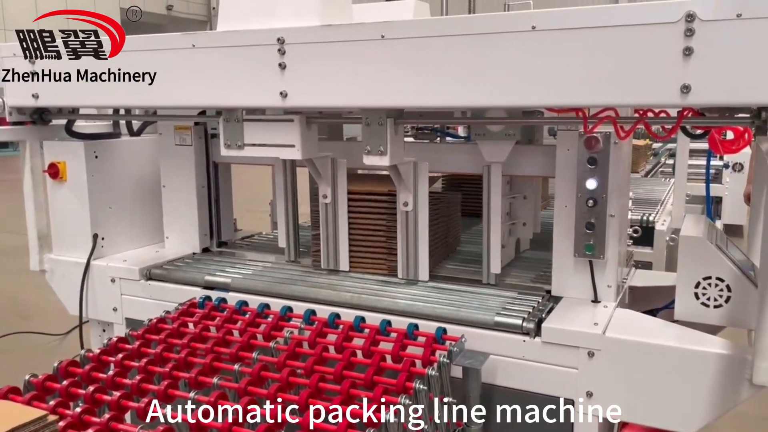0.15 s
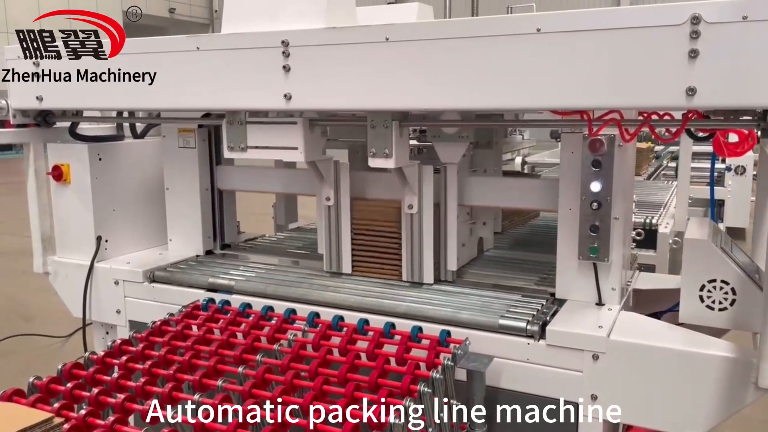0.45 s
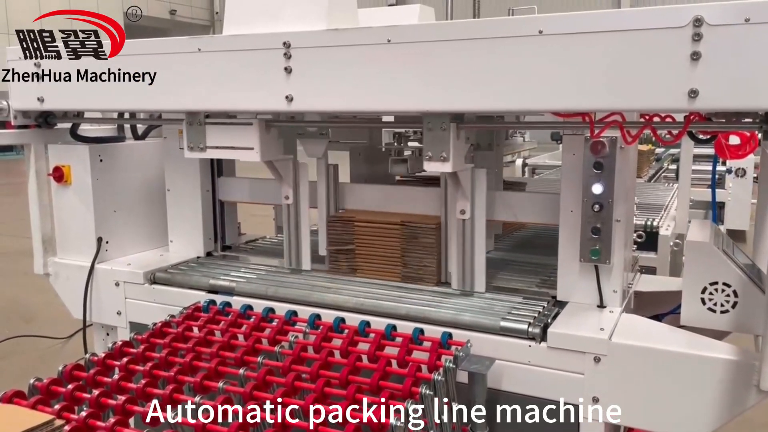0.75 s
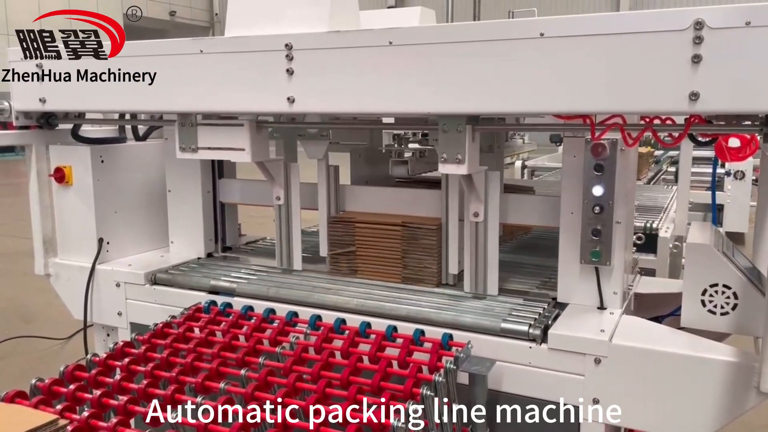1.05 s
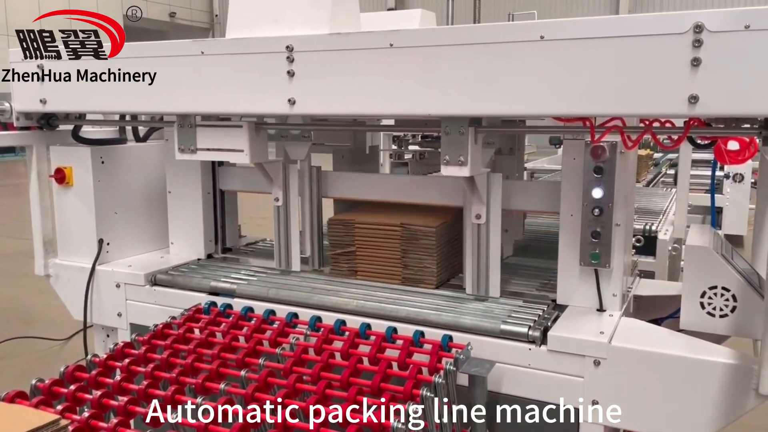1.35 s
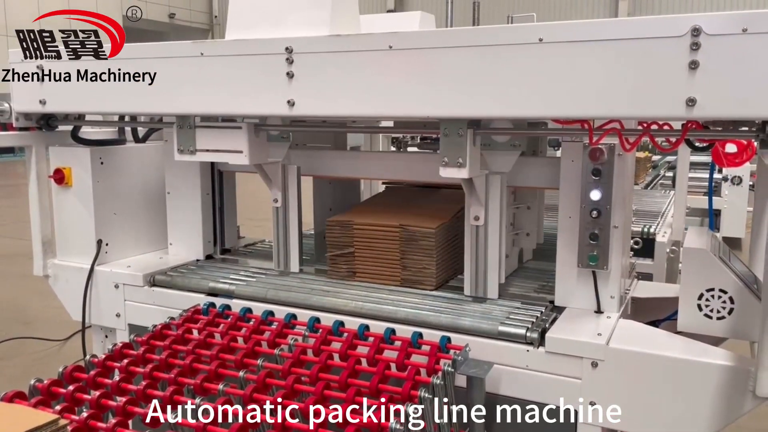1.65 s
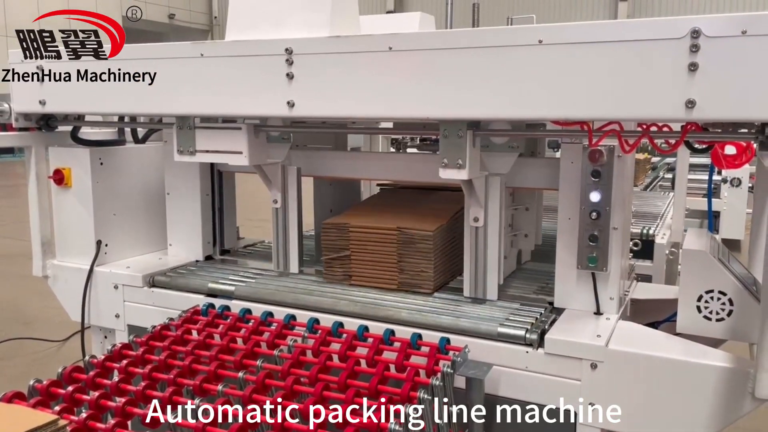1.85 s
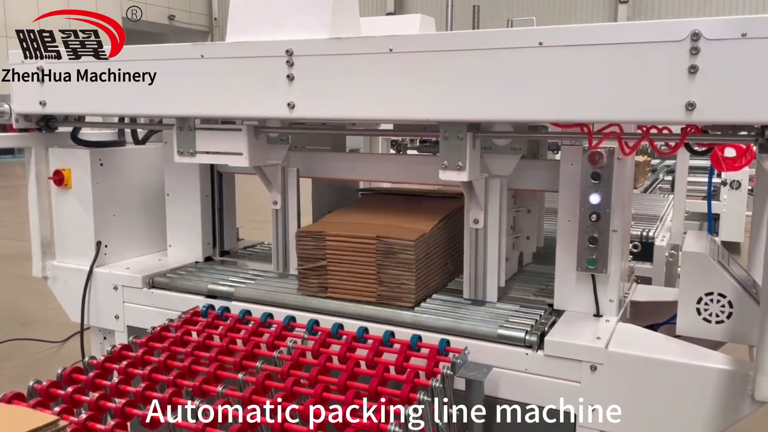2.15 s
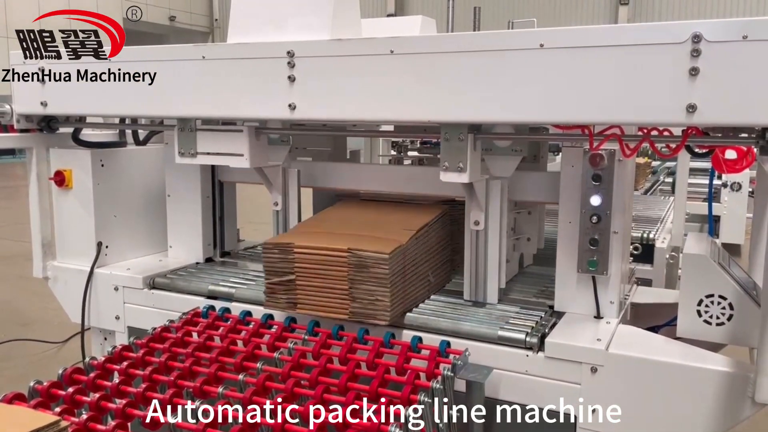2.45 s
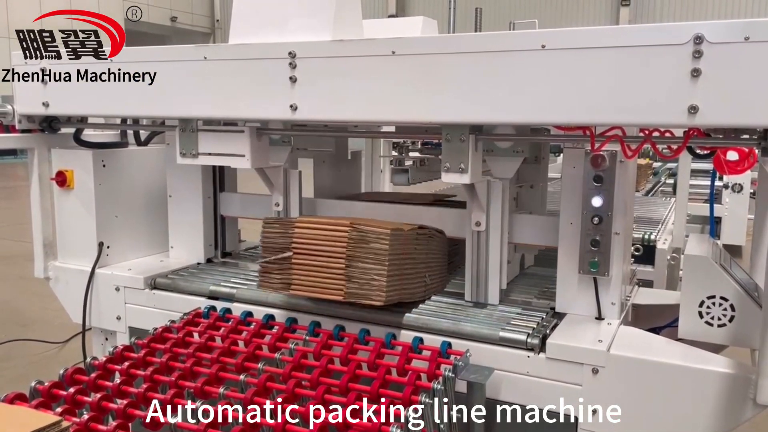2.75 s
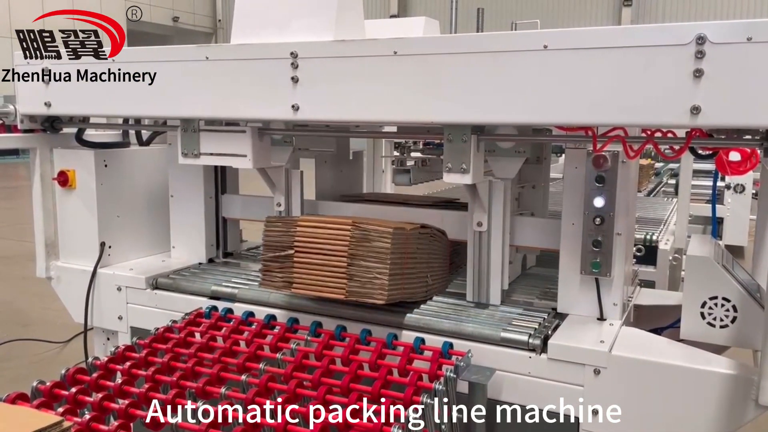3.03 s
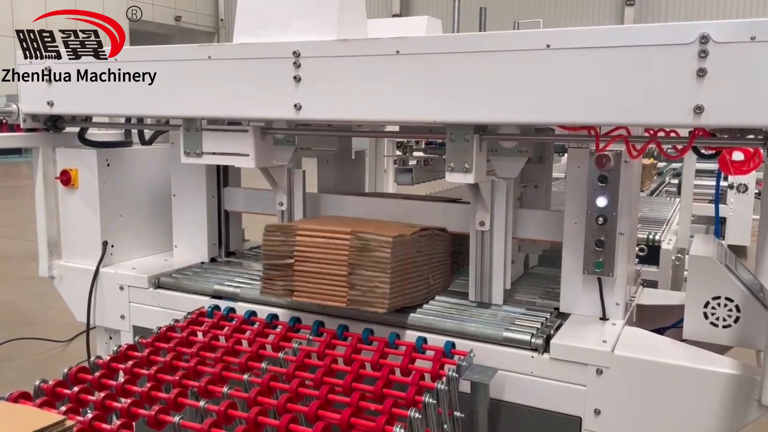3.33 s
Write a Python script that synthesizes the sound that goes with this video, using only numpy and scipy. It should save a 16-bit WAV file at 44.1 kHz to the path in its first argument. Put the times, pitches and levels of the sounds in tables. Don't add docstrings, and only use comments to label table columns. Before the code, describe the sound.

A packing machine clacks and thuds over roller rumble and scraping belts, with a triple snap early on, a brief motor hum, and rising servo whines, heard from a couple of metres in a factory hall.

```python
import sys
import numpy as np
from scipy import signal
from scipy.fft import rfft, irfft, next_fast_len
from scipy.io import wavfile
from scipy.ndimage import uniform_filter1d

SR = 44100
rng = np.random.default_rng(int(sys.argv[2]) if len(sys.argv) > 2 else 0)


def attenuation_scalar(level_db):
    decades = np.asarray(level_db, float) / 20
    return 10 ** decades


def generate_wav(signal):
    frames = np.transpose(np.atleast_2d(signal))
    scaled = np.clip(frames, -1, 1) * 32767
    pcm = np.round(scaled).astype(np.int16)
    wavfile.write(sys.argv[1], SR, pcm)


N = 153909

# (time [s], level [dB])
ROLLER_LOAD = [(0, -30.5), (.2, -33.5), (.4, -28.5), (.5, -24.5), (.8, -21.5), (.93, -23), (1.2, -21.5),
               (1.45, -27), (1.65, -26), (1.85, -33), (2.05, -27), (2.3, -31), (2.6, -29), (2.85, -33),
               (3.2, -33), (3.49, -31.5)]
# (pitch [Hz], width [Hz], level [dB])
FRAME_RESONANCES = [(63, 100, 4), (129, 61, 0), (219.4, 40, 3.5), (317, 57, -0.5), (385, 125, 3),
                    (590, 320, -5.5), (810, 50, -15), (1160, 550, -7.5)]
# (time [s], level [dB])
BELT_SCRAPE = [(0, -34.5), (.3, -32.5), (.6, -32), (.8, -30), (.94, -40.5), (1.1, -35.5), (1.4, -32.5),
               (1.68, -37.5), (1.9, -33), (2.15, -31), (2.25, -39), (2.6, -35.5), (2.85, -30.5),
               (3.02, -39), (3.49, -38.5)]
# (frequency [Hz], level [dB])
SCRAPE_COLOUR = [(700, 5.5), (1300, -53), (2000, 6), (2800, 8), (4500, 5), (6500, -1.5), (9000, -3),
                 (13000, -5.5)]
# (pitch [Hz], width [Hz], level [dB])
STEEL_RESONANCES = [(1176, 610, -0.5), (1820, 18, 1.5), (2450, 69, -4.5), (2900, 120, -1.5),
                    (4150, 42, -12), (4700, 280, -6)]
# (frequency [Hz], level [dB])
HALL_COLOUR = [(25, -1), (60, -14), (250, 0), (500, -4), (1200, -8), (2500, -8), (14000, -32)]
LINK_NOTES = [802, 1138, 1368, 1775, 2540, 2730, 3428, 3830, 4080, 4220, 4450, 4700, 5300]
# (time [s], level [dB], ring [Hz])
THUDS = [(.02, -26, 234), (0.086, -25.5, 79), (0.531, -12.5, 292), (2.129, -19, 367), (3.204, -32.5, 74),
         (0.253, -24, 240), (.26, -29.5, 75), (0.369, -22.5, 376), (.451, -6.5, 410), (.468, -11.5, 330),
         (.509, -16.5, 266), (0.571, -16, 237), (.678, -20, 191), (0.788, -12, 262), (1.25, -25, 69),
         (1.543, -21, 374), (1.709, -18.5, 313), (1.934, -13, 252), (2.109, -17, 350), (2.17, -27.5, 78),
         (2.5021, -19, 510), (2.639, -23, 250), (3.074, -16.5, 471), (3.276, -26, 183)]
# (time [s], level [dB], ring [Hz], fall [dB per 10 ms])
TICKS = [(.113, -20, 1700, 7), (.122, -21, 1750, 8), (0.436, -21, 2590, 2), (.61, -27, 2900, 4),
         (0.654, -26, 1750, 4), (0.5, -16, 1330, 9), (.648, -15.5, 1700, 7), (.6, -25, 870, 14),
         (.682, -18, 1770, 4), (.698, -20, 4530, 3.5), (.765, -26, 1170, -0.5), (.428, -17.5, 1240, 11),
         (.476, -19.5, 1230, 3), (0.513, -22, 1500, 12), (1.486, -26.5, 2620, -1),
         (1.718, -22.5, 1240, 3.5), (1.762, -24, 2290, 1.5), (1.903, -27, 1200, -0.5),
         (2.582, -25, 2540, 6.5), (2.799, -24, 2300, 8), (3.089, -29.5, 1170, -5),
         (2.504, -24.5, 2650, 6.5), (2.623, -24, 4800, 2.5), (2.635, -26, 4340, 6), (2.683, -28, 2780, 6),
         (2.72, -35, 3250, 10), (3.165, -37, 810, 10), (3.333, -31, 1320, 1), (3.357, -29.5, 2320, 3.5),
         (3.465, -31, 1290, 2)]
# (time [s], level [dB], pitch [Hz], time to fall 60 dB [s])
RINGS = [
    (.114, -19, 1792, .12),
    (.426, -24, 1770, .12),
    (.4505, -14, 1204, .06),
    (.4505, -12, 555, .05),
    (.652, -23, 1740, .1),
    (.684, -25, 1768, 0.11),
    (2.503, -12.5, 530, 0.037),
    (2.777, -20, 4620, .05),
    (3.074, -24, 475, .15),
    (3.277, -26, 191, 0.14),
]
# (time [s], level [dB], ring [Hz], treble [dB], fall [dB per 10 ms])
PUSHES = [
    (2.26, -40, 230, -22, 0.5),
    (.355, -11.5, 3160, -4, 4.5),
    (.42, -15.5, 1770, -20, 3),
    (2.04, -20, 5330, -5, 1.5),
    (2.63, -12, 3070, -11, 6),
    (3.062, -14, 2240, -9, 5),
    (3.27, -33.5, 5030, 11, 0.5),
]
# (time [s], level [dB], ring [Hz], treble [dB], fall [dB per 10 ms])
CLACKS = [(.441, -9.5, 1310, -17, 14), (.99, -22, 2540, -25, 1.5), (1.286, -19, 3000, -20, 4.5),
          (1.453, -13.5, 3700, -51, 7), (1.565, -13.5, 2640, -6, 8.5), (1.582, -14, 2640, -25, 3.5),
          (2.157, -10.5, 5500, -15, 6), (2.4315, -16.5, 4260, -16, 5), (2.534, -23, 2160, -21, 2),
          (2.776, -13, 4370, -45, 6.5), (2.892, -13, 4100, -12.5, 3.5), (2.92, -13, 3830, -7, 10)]
# (time [s], level [dB], ring [Hz], treble [dB], fall [dB per 10 ms])
SNAPS = [
    (.4505, -12.5, 1170, -15, 5.1),
    (.8205, -5.5, 4460, -10, 19),
    (.8295, -2, 4700, -19, 21),
    (.8365, -3.5, 3800, -31, 23),
    (1.546, -8.5, 1320, -4, 5.8),
]
# (start [s], length [s], from [Hz], towards [Hz], level [dB])
SERVO_RUNS = [
    (.575, .245, 2300, 4000, -42),
    (1.815, .32, 2400, 4020, -42),
    (2.6, .055, 3500, 1900, -44),
    (2.66, .205, 2350, 3950, -39.5),
]
# (multiple of the pitch, level [dB])
SERVO_OVERTONES = [(1, 3.5), (2, 1), (3, -5)]
# (time [s], pitch [Hz], level [dB])
DRIVE_HUM = [(1.005, 200.5, -58), (1.03, 200.5, -23), (1.11, 200, -30), (1.14, 198.5, -26),
             (1.25, 198, -26), (1.39, 198, -36), (1.55, 198, -52), (1.8, 196, -37), (2.0, 196, -58)]
# (multiple of the pitch, level [dB])
HUM_OVERTONES = [(1, 0), (2, -18), (4, -24)]
# (frequency [Hz], shared part [0 to 1])
PORT_LIKENESS = [(60, .8), (150, .97), (300, .92), (600, .62), (5000, .47), (7700, .94), (9200, .99),
                 (13000, .86)]
# (frequency [Hz], phase [radians])
PORT_LEAD = [(900, 0), (1800, -.9), (3450, 1.2), (5800, -1.4), (6800, -.6), (7800, -np.pi), (9750, -np.pi),
             (12200, -2 * np.pi)]
# (frequency [Hz], level [dB])
MIC_COLOUR = [(30, -11), (60, 0), (5000, -3.5), (6800, -6.5), (8500, -2), (12500, -2), (15000, -11),
              (16200, -32)]


def curve(table, hz):
    f, v = np.array(table, float).T
    return np.interp(np.log(hz + 1), np.log(f), v)


def follow(table, t, column=1):
    points = np.array(table)
    return np.interp(t, points[:, 0], points[:, column])


def peaks(table, hz):
    return np.sqrt(sum(attenuation_scalar(db) ** 2 / (1 + (2 * (hz - f) / width) ** 2) for f, width, db in table))


def unit(x):
    return x / np.sqrt(np.mean(x ** 2))


def walk(rate):
    k = int(SR / rate)
    steps = np.repeat(rng.standard_normal(N // k + 1), k)
    return unit(uniform_filter1d(uniform_filter1d(steps, k), k)[:N])


def ports(noise, gain):
    n = noise.shape[-1]
    like = np.clip(curve(PORT_LIKENESS, np.arange(n // 2 + 1) * SR / n), 0, 1)
    s = rfft(noise) * gain
    return irfft(s[:1] * np.sqrt(like) + s[1:] * np.sqrt(1 - like), n)


def steady(gain, flicker_db, rate):
    n = 2 * next_fast_len(N // 2 + 1)
    hz, out = np.arange(n // 2 + 1) * SR / n + 1, 0
    for k in range(10):
        band = np.clip(1 - abs(np.log2(hz / 31.25) - k), 0, 1)
        noise = ports(rng.standard_normal((3, n)), gain(hz) * np.sqrt(band))[:, :N]
        out = out + noise * attenuation_scalar(flicker_db * walk(rate))
    return unit(out)


def hits(rows, colour, attack_s):
    size, rattle_db = 8192, 0.5
    t, hz = np.arange(size) / SR, np.arange(size // 2 + 1) * SR / size + 1
    out = np.zeros((2, N + size))
    for start, db, *colouring, fall_db in rows:
        noise = rng.standard_normal((3, size))
        rattle = uniform_filter1d(np.repeat(rng.standard_normal(size // 64), 64), 64)
        fade = attenuation_scalar(-100 * t * max(fall_db, 1))
        shape = (1 - np.exp(-t / attack_s)) * fade * attenuation_scalar(rattle_db * rattle)
        i = int(start * SR)
        out[:, i:i + size] += unit(ports(noise, colour(hz, *colouring))) * shape * attenuation_scalar(db)
    return out[:, :N]


def rollers(t):
    rumble = steady(lambda hz: peaks(FRAME_RESONANCES, hz) * hz / (hz + 40), 1.97, 18)
    return rumble * attenuation_scalar(follow(ROLLER_LOAD, t))


def belts(t):
    def colour(hz):
        return attenuation_scalar(curve(SCRAPE_COLOUR, hz)) * (2.5 + peaks(STEEL_RESONANCES, hz))
    return steady(colour, 2.86, 17) * attenuation_scalar(follow(BELT_SCRAPE, t))


def hall():
    return steady(lambda hz: attenuation_scalar(curve(HALL_COLOUR, hz)), 6.0, 4.4) * attenuation_scalar(-40.5)


def links(t):
    size, count, t60_s = 2048, 1100, .08
    pitch_spread, scatter_db, tilt_db = .015, 2, -3
    u, z = rng.random((count, 3)), rng.standard_normal((count, 3))
    tt, out = t[:size], np.zeros((2, N + size))
    note = np.array(LINK_NOTES)[(u[:, 1] * len(LINK_NOTES)).astype(int)]
    pitches = note * (1 + pitch_spread * z[:, 0])
    for (when, _, slow), (_, strength, side), hz in zip(u, z, pitches):
        level_db = scatter_db * strength + tilt_db * np.log2(hz / 1000)
        fade = attenuation_scalar(level_db - 60 * tt / (t60_s * (.5 + slow)))
        port_phase = side * np.array([[.5], [-.5]])
        i = int(when * N)
        out[:, i:i + size] += (1 - np.exp(-tt / 0.0088)) * fade * np.sin(2 * np.pi * hz * tt + port_phase)
    return unit(out[:, :N]) * attenuation_scalar(-4 + follow(BELT_SCRAPE, t))


def thud_colour(hz, ring_hz):
    low_ring = np.exp(-.5 * (np.log2(hz / ring_hz) / 0.49) ** 2)
    return low_ring + attenuation_scalar(-19.5) / (1 + (hz / 1500) ** 2)


def thuds():
    rows = [(s, db, hz, .5 + 1.5 * hz / 100) for s, db, hz in THUDS]
    return hits(rows, thud_colour, attack_s=0.0051)


def room(x):
    t60_s, dull_hz = 0.32, 3940
    t = np.arange(SR // 2) / SR
    hz = np.arange(len(t) // 2 + 1) * 2
    tail = ports(rng.standard_normal((3, len(t))), 1 / np.hypot(1, hz / dull_hz))
    tail = tail * attenuation_scalar(-60 * t / t60_s) * (t > .006)
    tail = tail / np.sqrt(np.sum(tail[0] ** 2))
    return attenuation_scalar(-13) * signal.fftconvolve(x.mean(0, keepdims=True), tail, axes=1)[:, :N]


def latch_colour(hz, ring_hz, treble_db):
    treble_hz, ping_db = 5800, 7
    zone = np.exp(-.5 * (np.log2(hz / ring_hz) / 0.94) ** 2)
    broad = attenuation_scalar(-6) * (hz > 300) / (1 + (hz / treble_hz) ** 4)
    body = (zone + broad) * (attenuation_scalar(-4.5) + peaks(STEEL_RESONANCES, hz))
    ping = peaks([(ring_hz, .06 * ring_hz, ping_db)], hz) ** 2 / attenuation_scalar(ping_db)
    return body + ping + attenuation_scalar(treble_db) / (1 + (treble_hz / hz) ** 6)


def ticks():
    rows = [(s, db, hz, -45, fall_db) for s, db, hz, fall_db in TICKS]
    return hits(rows, latch_colour, attack_s=0.0017)


def rings(t):
    out = 0
    for start, db, hz, t60_s in RINGS:
        u = np.maximum(t - start, 0)
        out = out + attenuation_scalar(db - 60 * u / t60_s) * (1 - np.exp(-u / .001)) * np.sin(2 * np.pi * hz * u)
    return out


def pushes():
    return hits(PUSHES, latch_colour, attack_s=0.019)


def clacks():
    return hits(CLACKS, latch_colour, attack_s=.0035)


def snaps():
    return hits(SNAPS, latch_colour, attack_s=.0006)


def servo(t):
    settle_s, width_hz, patchy_db, clean = .072, 280, 1.5, .55
    out = 0
    for start, length, from_hz, towards_hz, db in SERVO_RUNS:
        speed = 1 - np.exp(-np.maximum(t - start, 0) / settle_s)
        phase = 2 * np.pi * np.cumsum(from_hz + (towards_hz - from_hz) * speed) / SR
        gate = np.clip((t - start) / 0.0067, 0, 1) * np.clip((start + length - t) / 0.014, 0, 1)
        for k, order_db in SERVO_OVERTONES:
            a, b = walk(width_hz * k), walk(width_hz * k)
            whine = (a + clean / k) * np.cos(k * phase) + b * np.sin(k * phase)
            out = out + attenuation_scalar(db + order_db + patchy_db * walk(39.9)) * gate * whine
    return out


def whirr(t):
    start, end = 0.99, 1.46
    gate = np.clip((t - start) / 0.047, 0, 1) * np.clip((end - t) / 0.24, 0, 1)
    hiss = steady(lambda hz: peaks([(3700, 1060, 0)], hz) ** 2, 2.9, 20.55)
    return hiss * gate * attenuation_scalar(-31)


def hum(t):
    pitch_hz = follow(DRIVE_HUM, t) * (1 + .0008 * walk(29.5))
    phase = 2 * np.pi * np.cumsum(pitch_hz) / SR
    tone = sum(attenuation_scalar(db + .6 * walk(28.4)) * np.sin(k * phase) for k, db in HUM_OVERTONES)
    return np.sqrt(2) * tone * attenuation_scalar(follow(DRIVE_HUM, t, column=2))


def scene():
    t = np.arange(N) / SR
    knocks = thuds() + ticks() + rings(t) + pushes() + clacks() + snaps()
    near = knocks + servo(t) + hum(t)
    background = rollers(t) + belts(t) + hall() + links(t)
    return near + room(near) + background + whirr(t)


def low_pass(x):
    return signal.sosfilt(signal.butter(12, 15700, fs=SR, output="sos"), x)


def record(dry):
    n = 2 * next_fast_len(N // 2 + 1)
    hz = np.arange(n // 2 + 1) * SR / n
    turn = np.exp(.5j * curve(PORT_LEAD, hz) * np.array([[1], [-1]]))
    mix = irfft(rfft(dry, n) * attenuation_scalar(curve(MIC_COLOUR, hz)) * turn, n)[:, :N]
    return low_pass(mix)


dry = scene()
out = record(dry)
generate_wav(out)
```